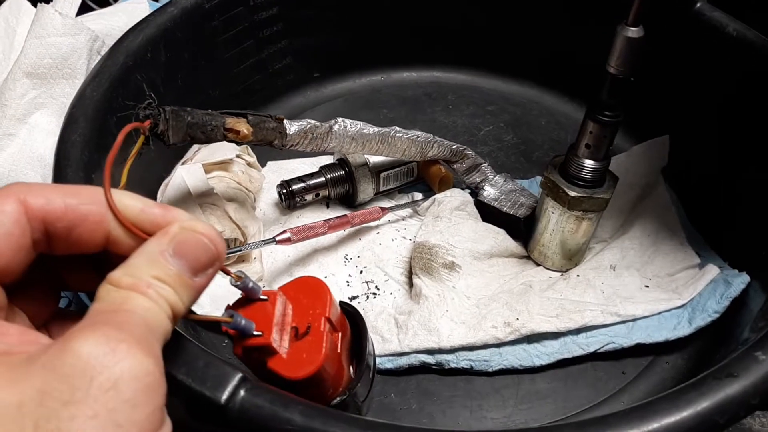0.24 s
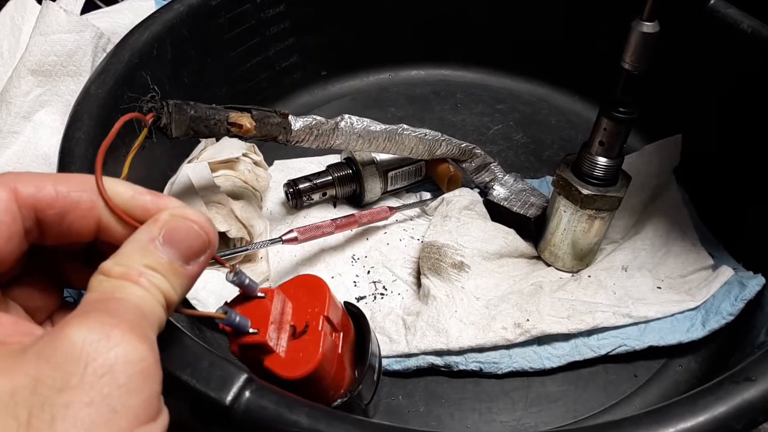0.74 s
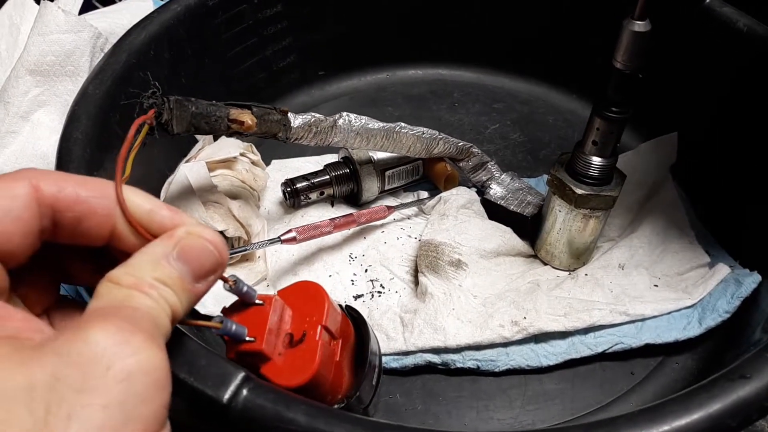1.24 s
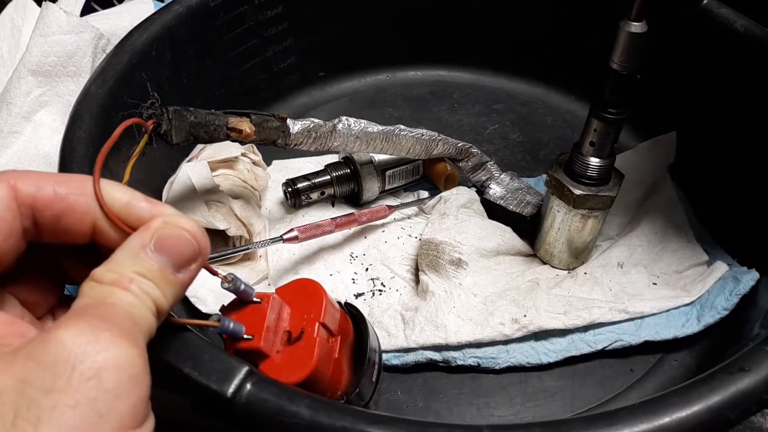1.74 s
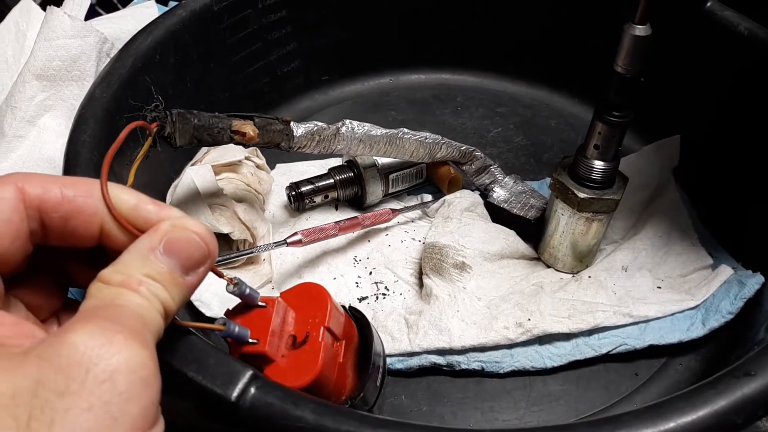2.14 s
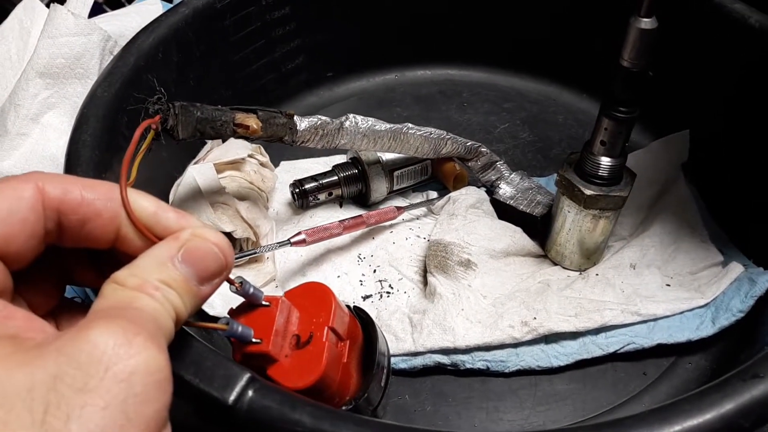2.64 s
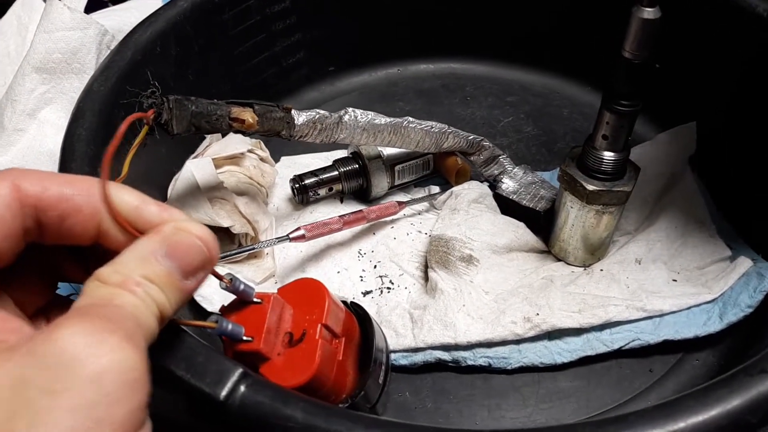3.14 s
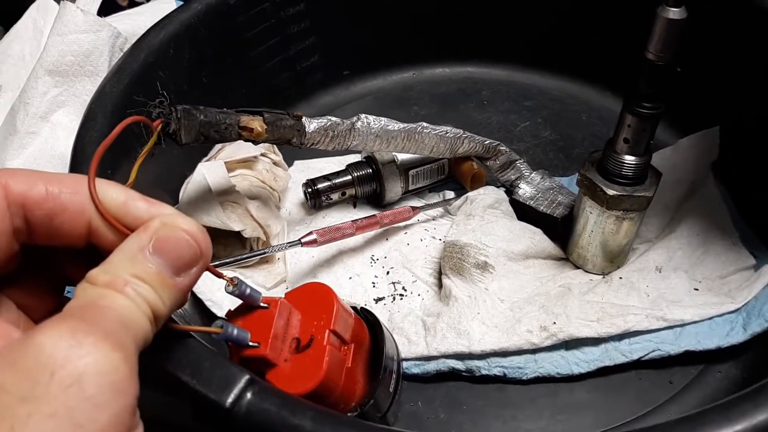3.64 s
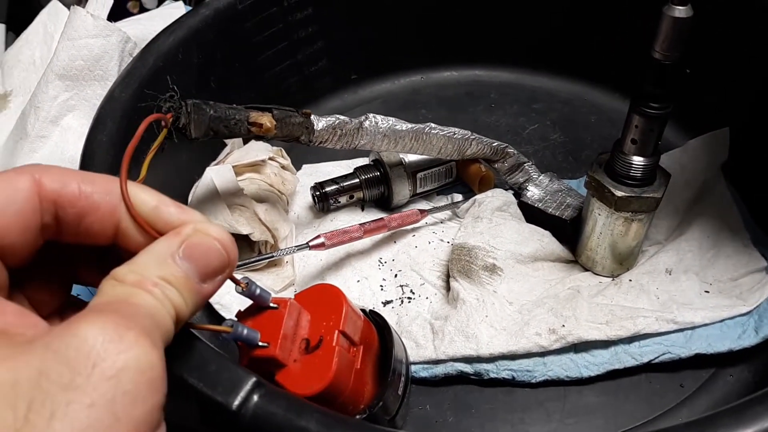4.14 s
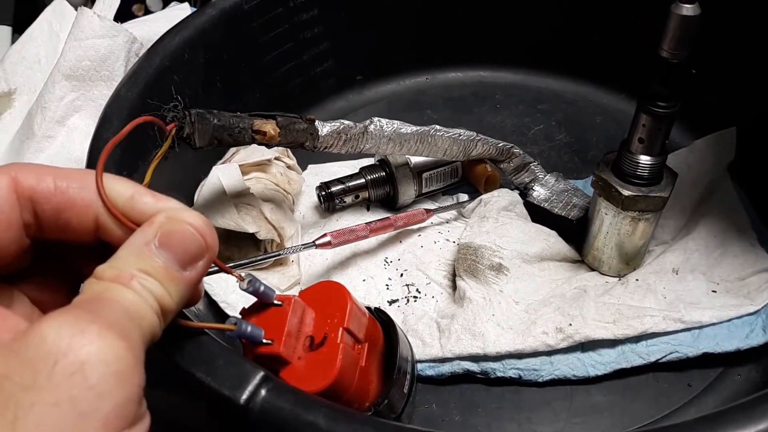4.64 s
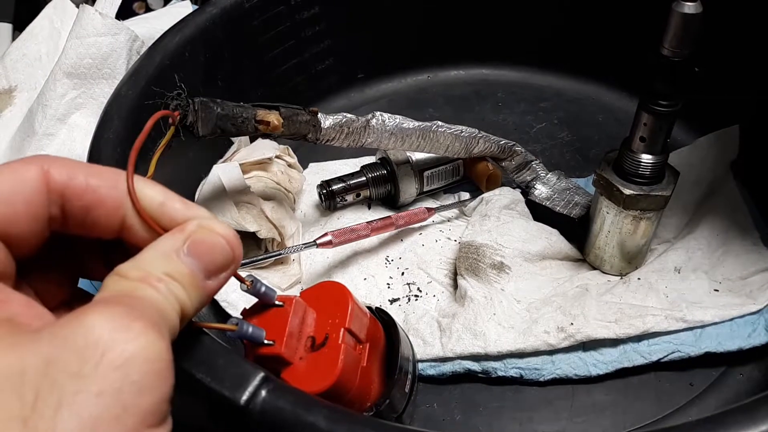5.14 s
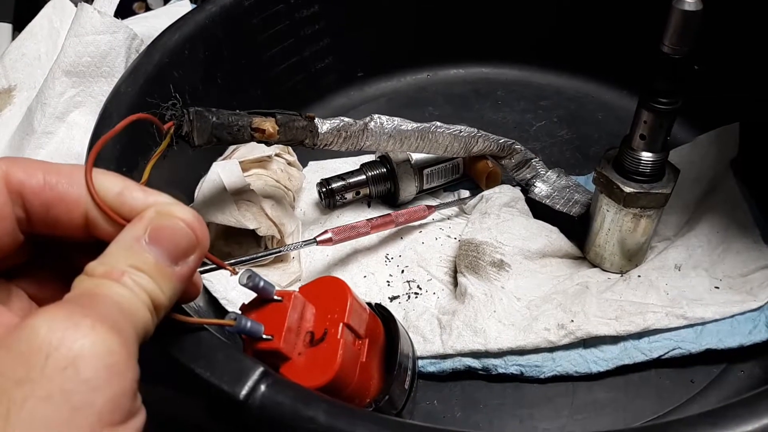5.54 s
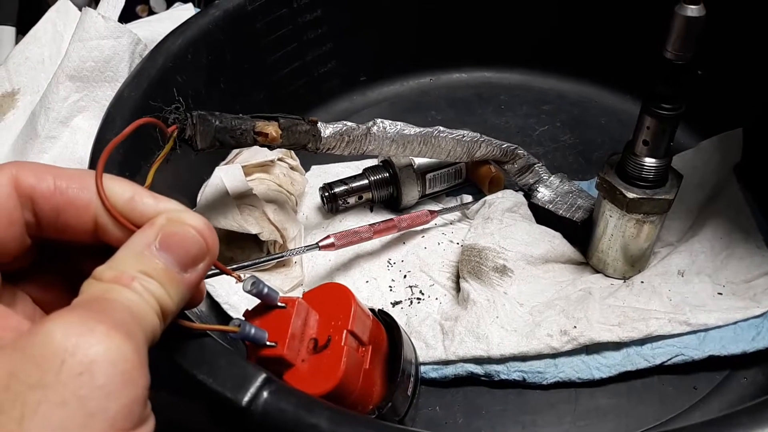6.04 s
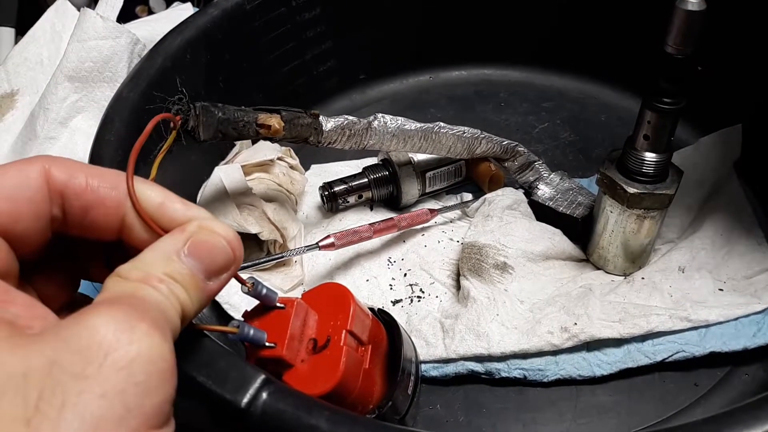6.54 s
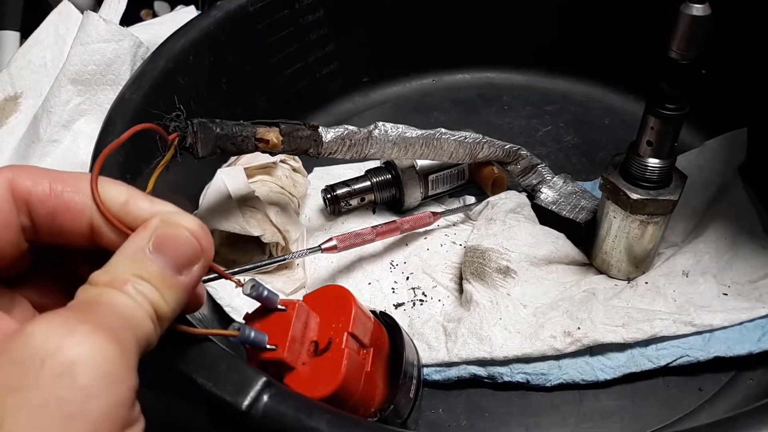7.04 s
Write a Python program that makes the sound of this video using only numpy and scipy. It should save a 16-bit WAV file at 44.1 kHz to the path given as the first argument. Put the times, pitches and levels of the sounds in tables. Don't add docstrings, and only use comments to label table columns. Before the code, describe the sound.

Steady airy hiss with oily sputter, cut five times by a sharp metallic snap and brief silence, then a thin jet and surging gush return.

```python
import sys
import numpy as np
from scipy import signal
from scipy.fft import rfft, irfft, next_fast_len
from scipy.io import wavfile
from scipy.ndimage import uniform_filter1d

SR = 44100
rng = np.random.default_rng(int(sys.argv[2]) if len(sys.argv) > 2 else 0)


def store_pcm(level_fs):
    pcm = np.round(np.clip(level_fs, -1, 1) * 32767).astype(np.int16)
    wavfile.write(sys.argv[1], SR, np.atleast_2d(pcm).T)


def magnitude_from_level(level_db):
    exponent = np.asarray(level_db, float) / 20
    return 10 ** exponent


N = 322371
SIZE = next_fast_len(N + SR)
HZ = np.maximum(np.arange(SIZE // 2 + 1) * SR / SIZE, 1)

# time in seconds, crack level in dB, pan thump level in dB.
SNAPS = [
    (1.1204, -22.5, -34),
    (2.3391, -21.5, -34.5),
    (4.042, -21.5, -33),
    (5.0946, -20, -33.5),
    (6.3867, -21.5, -34.5),
]


def curve(points):
    hz, value = np.transpose(points)
    return np.interp(np.log(HZ), np.log(hz), value)


def modes(table):
    total = 0
    for k, (hz, width, db) in enumerate(table):
        resonance = 1j * HZ * width / (hz ** 2 - HZ ** 2 + 1j * HZ * width)
        total = total + (-1) ** k * magnitude_from_level(db) * resonance
    return total


def shape(x, response):
    return irfft(rfft(x, SIZE) * response, SIZE)[..., :N]


def unit(response, lo_hz, hi_hz):
    band = response[(HZ > lo_hz) & (HZ < hi_hz)]
    return response / np.sqrt(np.sum(np.abs(band) ** 2) / len(HZ))


def walk(rate):
    hold = int(SR / rate)
    steps = np.repeat(rng.standard_normal(N // hold + 1), hold)
    return 1.42 * uniform_filter1d(steps, hold)[:N]


def noise_pair():
    # frequency in Hz, share of the hiss common to both microphones from 0 to 1.
    likeness = [(100, 0.88), (500, 1), (1200, 0.62), (2500, 0.32), (5000, 0.02), (15000, 0)]
    common, own = rng.standard_normal((2, N))
    share = np.clip(curve(likeness), 0, 1)
    left = shape(common, share) + shape(own, np.sqrt(1 - share ** 2))
    return np.array([left, common])


def burst(noise, t, tau_s):
    x = noise * t / tau_s * np.exp(1 - t / tau_s)
    return x * np.sqrt(tau_s * SR / np.sum(x ** 2))


def diffuse(t60_s, start_s):
    t = np.arange(SR // 2) / SR
    fade = np.exp(-np.log(1000) * t / t60_s) * (t > start_s)
    tail = rng.standard_normal((2, len(t))) * fade
    return rfft(tail / np.sqrt(np.sum(tail ** 2, axis=1, keepdims=True)), SIZE)


def quiet():
    # frequency in Hz, level in dB per Hz.
    hum_and_hiss = [(76, -35.5), (130, -24.5), (224, -14), (279, -28), (453, -16.5), (625, -33),
                    (1460, -29), (1860, -27.5), (5730, -7), (7910, -21), (12800, -13.5), (15100, -11.5),
                    (16000, -13)]
    # frequency in Hz, left minus right in dB.
    balance = [(60, 1.5), (110, 31), (200, -5), (380, 26), (700, -6), (1290, 6), (2380, 16), (4400, 6),
               (8120, -21.5), (15000, -13)]
    half = curve(balance) / 2
    x = shape(magnitude_from_level(1.5 * walk(6)) * noise_pair(), magnitude_from_level(curve(hum_and_hiss) + np.array([half, -half])))
    return x * magnitude_from_level(-54.5) / np.std(x.mean(axis=0))


def rumble():
    # time in seconds, level in dB, length in seconds.
    jolts = [(.45, -76, .05), (1.136, -61, 0.022), (1.218, -60.5, 0.11), (1.503, -59, 0.078),
             (1.712, -58, 0.022), (2.347, -62, 0.052), (2.58, -68, .04), (2.786, -71, 0.048),
             (3.195, -54, 0.075), (4.05, -55, .04), (4.406, -62, .05), (5.118, -69.5, 0.098),
             (5.41, -71, 0.042), (6.09, -66, 0.073), (6.397, -61, 0.054), (6.853, -71.5, 0.17)]
    still_hand_db = -82
    common, left, right = rng.standard_normal((3, N))
    t = np.arange(N) / SR
    gain = magnitude_from_level(still_hand_db - 2 + 1.06 * walk(4.7))
    for s, db, length in jolts:
        gain += magnitude_from_level(db - 7) * np.exp(-np.abs(t - s) / length)
    noise = common + 0.73 * np.array([left, right])
    return shape(gain * noise, unit(modes([(119.0, 203, 0)]) ** 3, 35, 140))


def ticks():
    # time in seconds, scratch level in dB, scratch pitch in Hz, treble level in dB.
    touches = [(1.1898, -18, 4230, -21.5), (1.4795, -23.5, 5740, -21), (1.5381, -20, 4000, -25),
               (2.414, -34, 3900, -47), (2.432, -28.5, 2590, -42), (3.1901, -16, 4430, -22),
               (3.3514, -19, 4300, -48), (3.3694, -37, 4400, -48), (4.0744, -36, 4500, -61),
               (4.4313, -17.5, 5500, -16.5), (5.019, -22, 4160, -52), (5.023, -18, 4300, -50),
               (5.166, -20.5, 3700, -58), (5.1758, -16.5, 4060, -62), (5.192, -25, 4400, -53),
               (5.2107, -33, 4450, -59), (5.263, -38, 4650, -59), (5.3153, -31, 4700, -51),
               (5.3647, -30, 4150, -25), (5.3789, -16, 4600, -18), (5.394, -31, 4300, -20),
               (5.5762, -25, 4260, -47), (6.3694, -43, 4360, -46), (6.5937, -34.5, 5520, -65),
               (6.8578, -36, 3600, -16), (6.8892, -24, 4470, -35.5)]
    tick_s, width_hz = 0.00048, 3500
    t = np.arange(1024) / SR
    hz_axis = np.arange(len(t) // 2 + 1) * SR / len(t)
    scratch, spit = np.zeros(N), np.zeros(N)
    grits = rng.standard_normal((len(touches), 2, len(t)))
    for (s, db, hz, treble_db), grit in zip(touches, grits):
        at = slice(int(s * SR), int(s * SR) + len(t))
        ring = 1j * hz_axis * width_hz / (hz ** 2 - hz_axis ** 2 + 1j * hz_axis * width_hz)
        scratch[at] += magnitude_from_level(db) * irfft(ring ** 2 * rfft(burst(grit[0], t, tick_s)))
        spit[at] += magnitude_from_level(treble_db) * burst(grit[1], t, tick_s)
    scratch += shape(scratch, modes([(913, 640, 18.0)]))
    return scratch + shape(spit, unit(modes([(12230, 4000, 0)]) ** 2, 8300, 18000))


def knocks():
    # time in seconds, crack level in dB, pan thump level in dB,
    # thump pitch in Hz, tick level in dB.
    lead_knocks = [(1.6848, -20, -24.5, 450, -39), (1.727, -23, -20, 383, -47.5),
                   (2.432, -48, -46, 336, -37.5), (2.5889, -26.5, -29, 405, -48.5),
                   (2.6066, -27, -42, 317, -35), (3.3358, -26.5, -43, 390, -53.5),
                   (3.6073, -32.5, -43.5, 460, -52), (6.0706, -52, -57, 312, -47),
                   (6.4782, -60, -60.5, 505, -52), (6.499, -55, -56, 387, -61)]
    # pitch in Hz, width in Hz, level in dB.
    steel_modes = [(760, 1200, -11.5), (1420, 650, -5.5), (2000, 370, 0), (2303, 97, 3.5), (2624, 170, 4.5),
                   (3700, 660, -1.5), (4400, 500, 3), (4700, 400, 1), (5250, 320, -9), (7030, 180, -6)]
    blows = [(*row, 371, -32.5, 3.5) for row in SNAPS]
    blows += [(*row, 6.5) for row in lead_knocks]
    t = np.arange(2048) / SR
    crack, tick, thump = np.zeros(N), np.zeros(N), np.zeros((2, N))
    habit = rng.standard_normal(len(t))
    grit = rng.standard_normal((len(blows), 2, len(t)))
    for (s, crack_db, thump_db, hz, tick_db, pan_db), (rattle, fizz) in zip(blows, grit):
        at = slice(int(s * SR), int(s * SR) + len(t))
        strike = burst(habit + 0.36 * rattle, t, tau_s=0.00071)
        crack[at] += magnitude_from_level(crack_db) * (strike + magnitude_from_level(-16.5) * burst(fizz, t, tau_s=0.0033))
        tick[at] += magnitude_from_level(tick_db) * burst(fizz, t, tau_s=0.0013)
        push = (t / 0.0036 * np.exp(1 - t / 0.0032)) ** 2
        swing = push * np.sin(2 * np.pi * hz * (t - 0.0004))
        thump[:, at] += magnitude_from_level(thump_db + 9.5 + np.array([[pan_db], [-pan_db]]) / 2) * swing
    steel = shape(crack, magnitude_from_level(4.5) * unit(modes(steel_modes), 1500, 7100))
    steel += shape(tick, magnitude_from_level(-5.5) * unit(modes([(11300, 5000, 0)]) ** 2, 6800, 20000))
    return steel, thump + shape(thump, modes([(180.4, 16, 2.5), (680, 80, -78)]))


def pops(rate, scatter_db, uneven):
    chance = rng.uniform(-1, 1, (N // 100, 2))
    at = np.cumsum(SR / rate * np.exp(uneven * chance[:, 0])).astype(int)
    x = np.zeros(N)
    x[at[at < N]] = magnitude_from_level(scatter_db * chance[at < N, 1])
    return x / np.sqrt(np.mean(x ** 2))


def stages():
    # start in seconds, rise in seconds, jet level in dB,
    # jet level in dB as the needle lifts, oil level in dB.
    leaks = [
        (1.327, 0.025, -37.5, -46.5, -52),
        (2.518, 0.062, -40, -42, -61),
        (4.263, .034, -40.5, -40.5, -59.5),
        (5.304, 0.032, -44.5, -37.5, -70),
        (6.672, 0.032, -38, -33, -62.5),
    ]
    # peak time in seconds, surge level in dB,
    # bore gurgle level in dB, settled hiss level in dB, settled sputter level in dB.
    lifts = [
        (-.4, -28, -30, -44.5, -51.5),
        (1.584, -27, -30.5, -43.5, -50),
        (3.236, -28, -31, -45.5, -52),
        (4.466, -27.5, -29.5, -46.5, -51.5),
        (5.425, -27.5, -31, -46.5, -53),
        (6.937, -27, -39.5, -42.5, -58.5),
    ]
    narrow_share = [0.49, 0.16, 0.25, 0.013]
    puff_db, puff_s, sag_s = 2.5, 0.021, 0.17
    creep_db, jet_bore_db = -19, -15
    rise_s, shoulder_s, gurgle_s, settled_s = 0.024, 0.017, 0.075, 0.16
    shoulder_db, gurgle_hiss_db, drain_db_per_s = -5, -7, -2
    dry_db, splash_db = -38, 8
    surge_bore_db, open_bore_db = -14, 0.2
    spells = []
    shuts = [s - 0.002 for s, *_ in SNAPS] + [N / SR]
    for leak, (peak, surge_db, gurgle_db, hiss_db, oil_db), shut in zip([None] + leaks, lifts, shuts):
        rows = []
        if leak:
            start, rise, jet_db, end_db, wet_db = leak
            full, lift = start + rise, peak - rise_s
            jet_path = [
                (start, jet_db + creep_db),
                (start + 0.43 * rise, jet_db + 0.46 * creep_db),
                (full, jet_db + puff_db),
                (full + puff_s, jet_db),
                (max(full + puff_s, lift - sag_s), jet_db),
                (lift, end_db)]
            rows = [(s, db, 1, wet_db + db - jet_db, db + jet_bore_db) for s, db in jet_path]
        drain_db = drain_db_per_s * (shut - peak - settled_s)
        blown_db, surge_whistle_db = oil_db + dry_db, surge_db + surge_bore_db
        spells.append(rows + [
            (peak, surge_db, narrow_share[0], blown_db, surge_whistle_db),
            (peak + shoulder_s, surge_db + shoulder_db, narrow_share[1], blown_db, surge_whistle_db),
            (peak + gurgle_s, surge_db + gurgle_hiss_db, narrow_share[2], oil_db + splash_db, gurgle_db),
            (peak + settled_s, hiss_db, narrow_share[3], oil_db, hiss_db + open_bore_db),
            (shut, hiss_db + drain_db, narrow_share[3], oil_db, hiss_db + open_bore_db)])
    return spells


def airflow():
    # frequency in Hz, level in dB per Hz.
    jet_curve = [(88, -36.5), (150, -20), (555, -19), (805, -12), (960, -20), (1340, -16), (1690, -18),
                 (3920, -2), (5570, -5), (6510, -1.5), (8900, -10.5), (11900, -1.5), (16000, -13)]
    # pitch in Hz, width in Hz, level in dB.
    outlet_modes = [(5740, 2300, -10), (6720, 143, 2), (7170, 74, 5.5), (8010, 760, -3), (8850, 1000, -6),
                    (11700, 3900, -11), (12670, 1150, -4), (13800, 350, -7.5), (14300, 500, -15)]
    bore_modes = [(3650, 600, 10.5), (4516, 410, 10), (2754, 530, -0.5), (4880, 1400, -5.5)]
    sputter_modes = [(377, 99, -5.5), (870, 188, -6.5), (1167, 198, -4.5), (1924, 302, 0), (2570, 790, -5),
                     (3540, 520, -0.5), (4400, 690, -4), (6820, 450, -12)]
    t, gain = np.arange(N) / SR, np.zeros((5, N))
    for rows in stages():
        s, hiss_db, share, sputter_db, bore_db = np.transpose(rows)
        s = np.maximum.accumulate(s)
        on = (t >= s[0]) & (t <= s[-1])
        narrow = np.clip(np.interp(t[on], s, share), 0, 1)
        hiss, sputter, bore = (magnitude_from_level(np.interp(t[on], s, db)) for db in (hiss_db, sputter_db, bore_db))
        wet = np.clip(sputter / (0.2 * bore) - 1.2, 0, 1)
        gain[0, on] = hiss * np.sqrt(narrow)
        gain[1, on] = hiss * np.sqrt(1 - narrow)
        gain[2, on] = sputter * (1 - 0.3 * narrow)
        gain[3, on] = bore * (1 - 0.5 * narrow)
        gain[4, on] = wet
    jet_gain, outlet_gain, sputter_gain, bore_gain, wet = uniform_filter1d(gain, size=60)
    films = pops(rate=108, scatter_db=4.8, uneven=0.3)

    jet_noise = jet_gain * magnitude_from_level(0.61 * walk(60)) * noise_pair()
    jet = shape(jet_noise, unit(magnitude_from_level(curve(jet_curve)), 6000, 15000))
    outlet_noise = outlet_gain * magnitude_from_level(0.61 * walk(70)) * noise_pair()
    outlet = shape(outlet_noise, unit(modes(outlet_modes), 6000, 15000))
    drive = -0.24 * wet * films + (1 - 0.5 * wet) * magnitude_from_level(1.7 * walk(90)) * noise_pair()
    bore = shape(bore_gain * drive, magnitude_from_level(-2.5) * unit(modes(bore_modes), 3560, 4140))
    spatter = 0.85 * wet * films + (0.8 - 0.45 * wet) * noise_pair()
    sputter = shape(sputter_gain * spatter, unit(modes(sputter_modes), 1815, 2126))
    no_bass = 1 / (1 - 1j * 1200 / HZ) ** 2
    return jet + sputter + shape(outlet + bore, no_bass)


def from_valve(pair):
    # frequency in Hz, left minus right in dB.
    shadow = [(60, -10), (200, 2.5), (400, 2.5), (800, -9.5), (1400, 0.5), (2000, 4.5), (2900, 6.5),
              (4300, -6.5), (6500, -8.5), (8000, -12.5), (10100, -13.5), (11500, -16.5), (14000, -14.5),
              (15500, -20)]
    # frequency in Hz, delay of the left in samples.
    left_lag = [(350, 11), (700, 6), (1000, 4), (1300, 6), (1650, 19), (1900, 23), (2800, 24), (3500, 21)]
    # delay in seconds, left level in dB, right level in dB.
    pan_echoes = [(.0016, -53, -10.5)]
    half = magnitude_from_level(curve(shadow) / 2)
    echoes = 1
    for s, left_db, right_db in pan_echoes:
        echoes = echoes + magnitude_from_level(np.array([[left_db], [right_db]])) * np.exp(-2j * np.pi * HZ * s)
    echoes = echoes + magnitude_from_level(np.array([[-7.0], [-13.0]])) * diffuse(t60_s=0.03, start_s=0.001)
    late = np.exp(-2j * np.pi * HZ * curve(left_lag) / SR)
    return shape(pair, echoes * np.array([half * late, 1 / half]))


def garage(x, t60_s, level_db, top_hz):
    dull = magnitude_from_level(level_db) / (1 + 1j * HZ / top_hz) ** 2
    return shape(x.mean(axis=0), diffuse(t60_s, start_s=0.00686) * dull)


def scene():
    air = airflow()
    steel, thump = knocks()
    near = from_valve(air + steel + ticks())
    tail = garage(near + 0.38 * thump, t60_s=0.29, level_db=-3.5, top_hz=2220)
    loudness = uniform_filter1d(air[1] ** 2, size=3000)
    duck = 1 / np.sqrt(1 + loudness / magnitude_from_level(-49) ** 2)
    return near + thump + tail + duck * quiet() + rumble()


def low_pass(x):
    return signal.sosfilt(signal.butter(12, 17060, fs=SR, output="sos"), x)


def record(dry):
    # frequency in Hz, level in dB.
    steep_top = [(15750, 0), (15950, -27), (16500, -30), (17000, -65)]
    mix = shape(dry, magnitude_from_level(curve(steep_top)))
    return low_pass(mix)


dry = scene()
out = record(dry)
store_pcm(out)
```